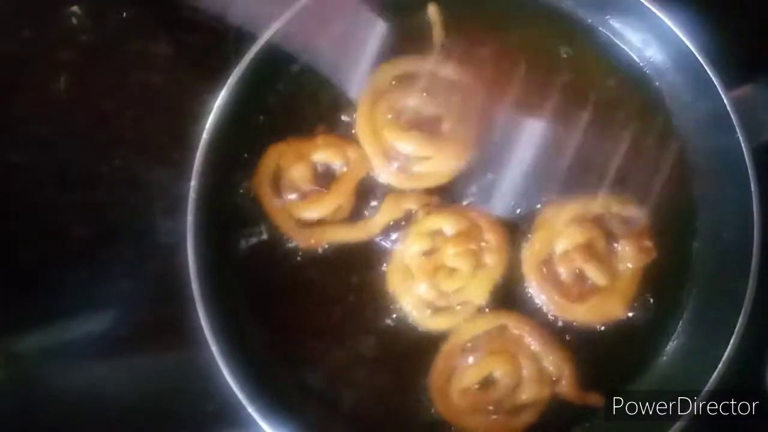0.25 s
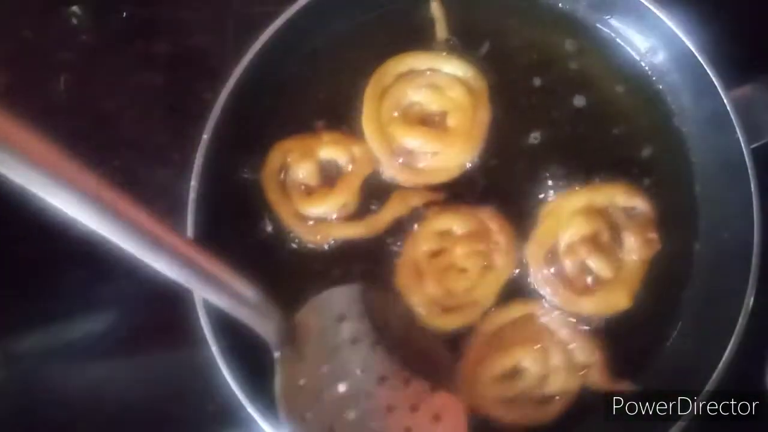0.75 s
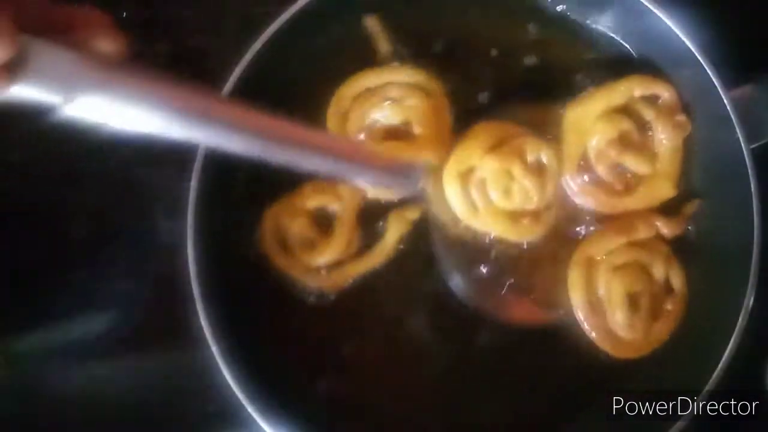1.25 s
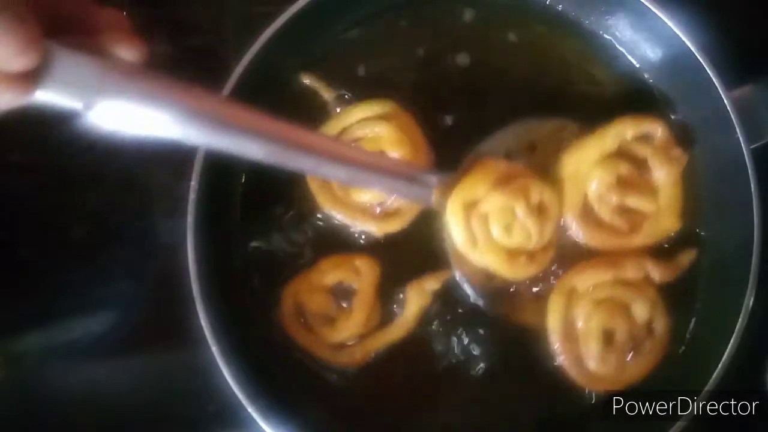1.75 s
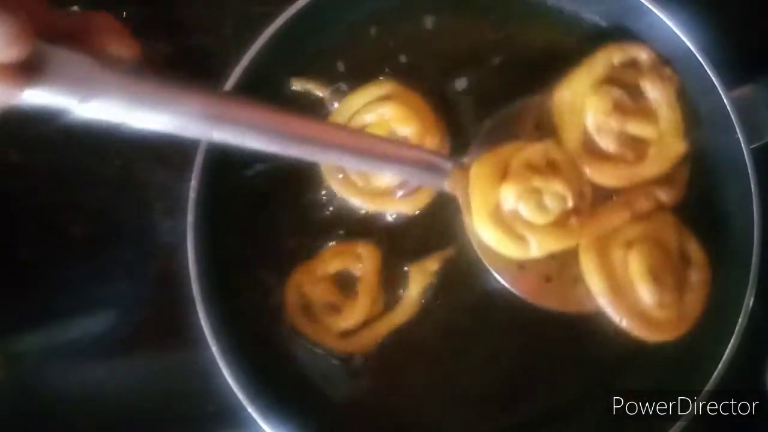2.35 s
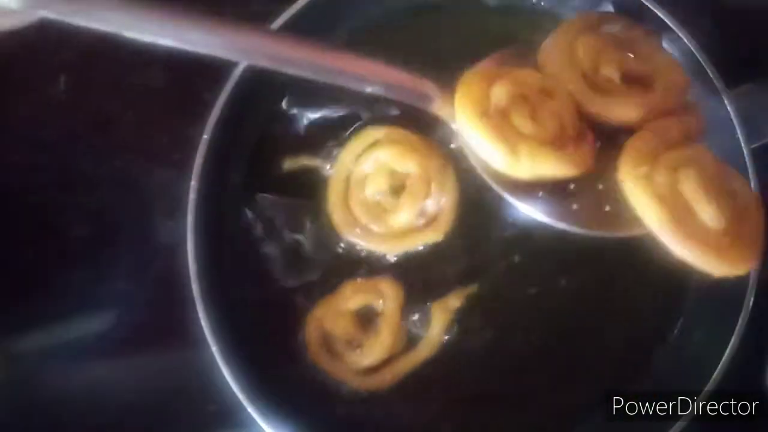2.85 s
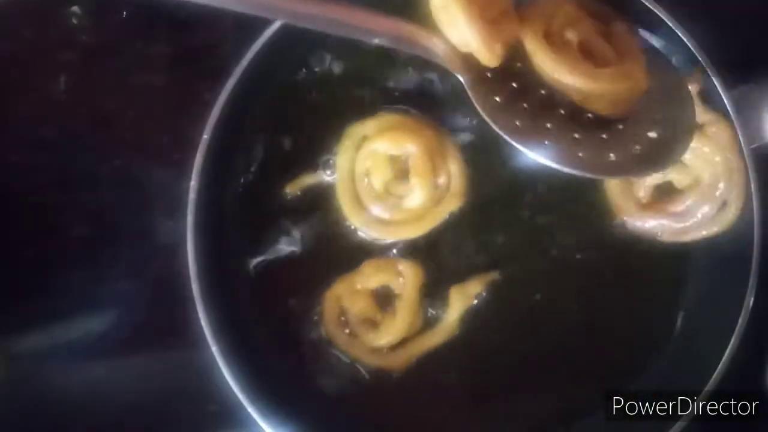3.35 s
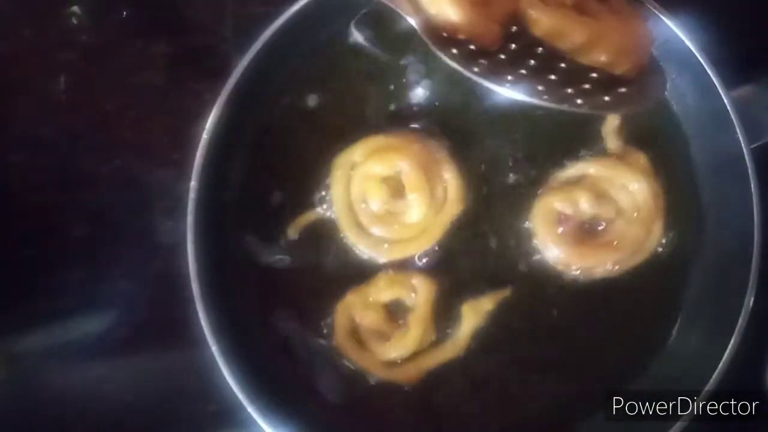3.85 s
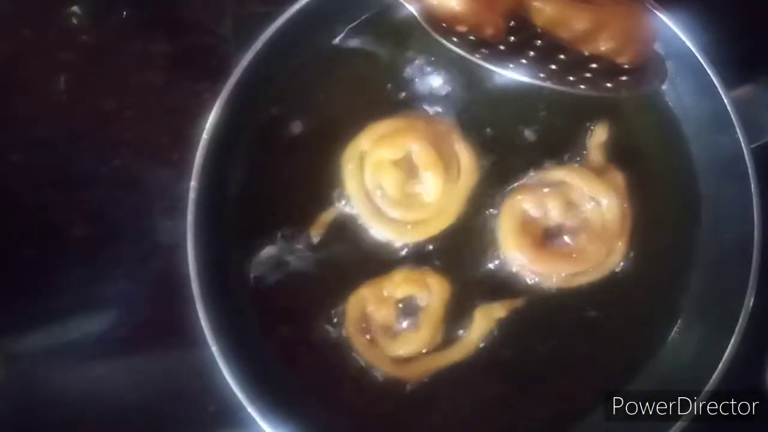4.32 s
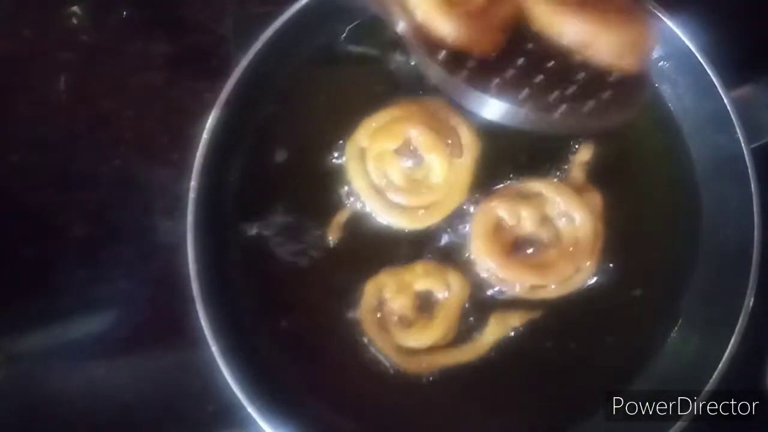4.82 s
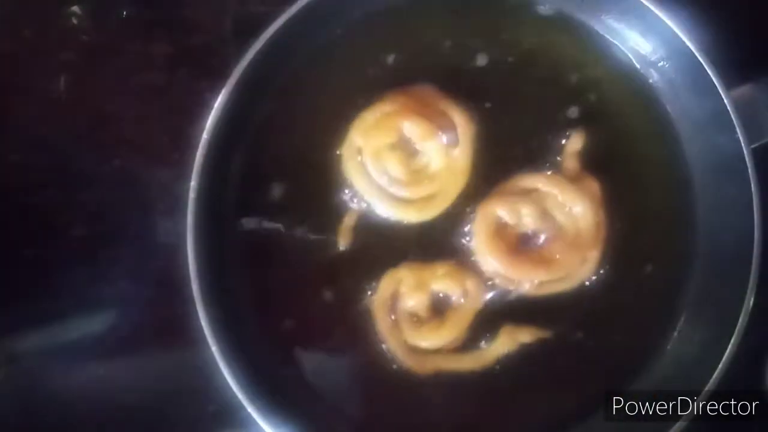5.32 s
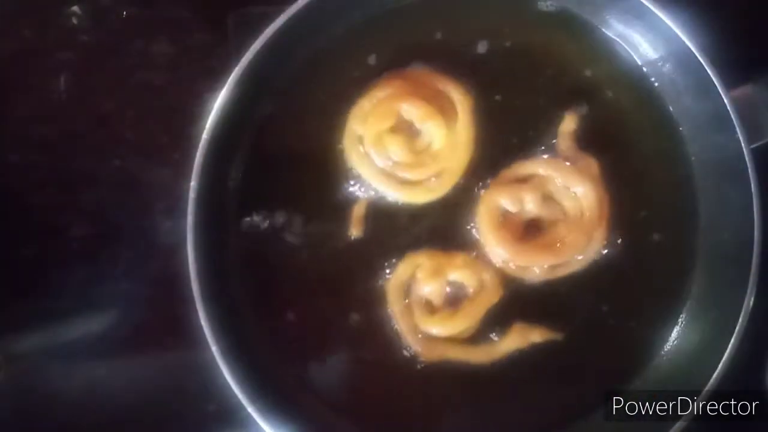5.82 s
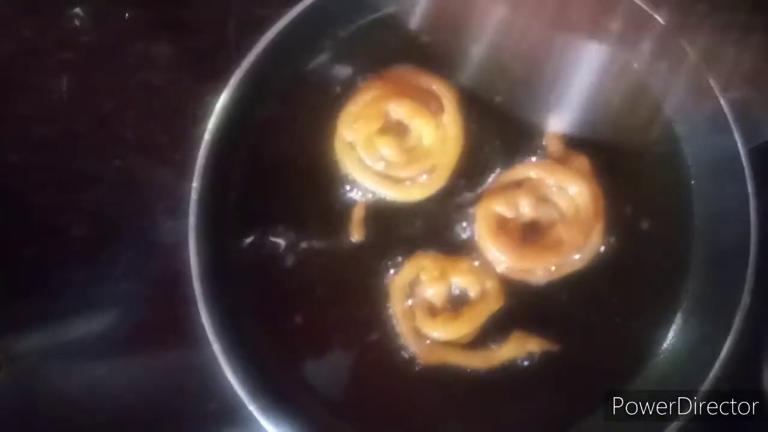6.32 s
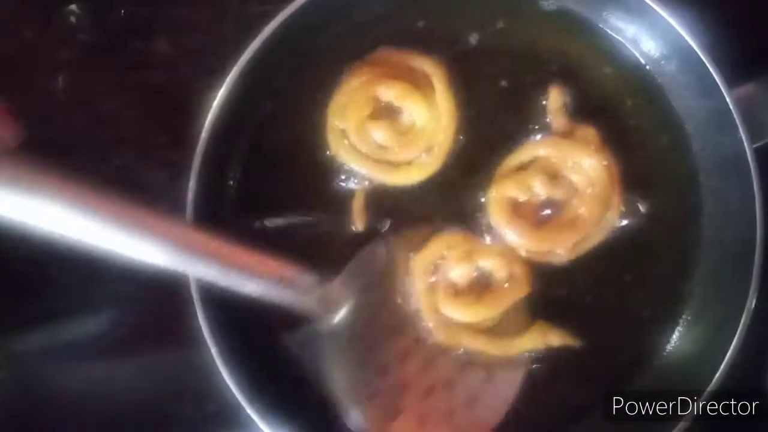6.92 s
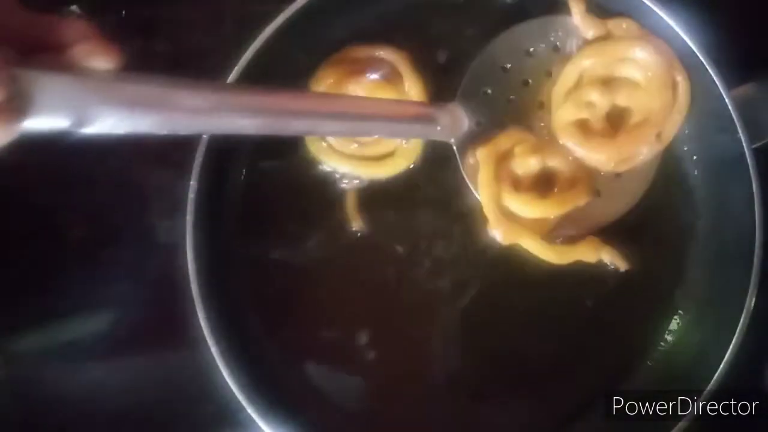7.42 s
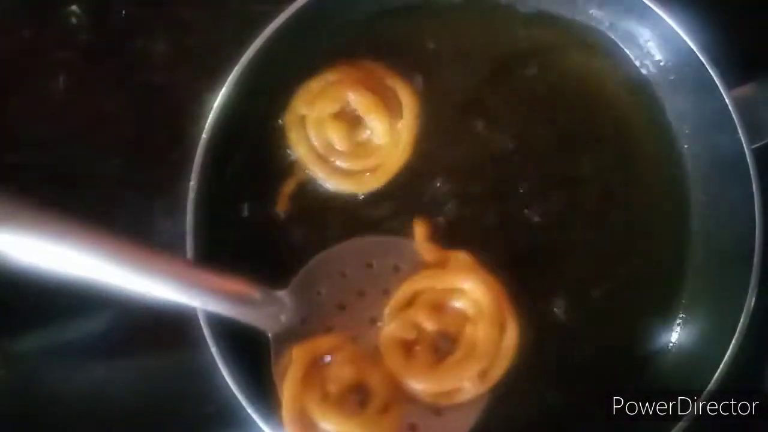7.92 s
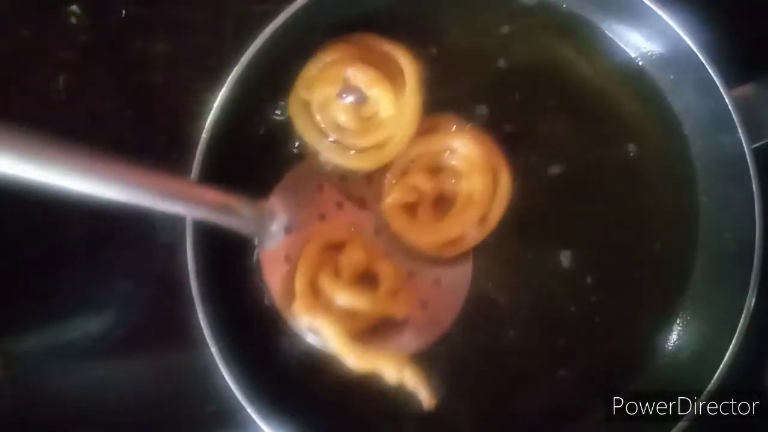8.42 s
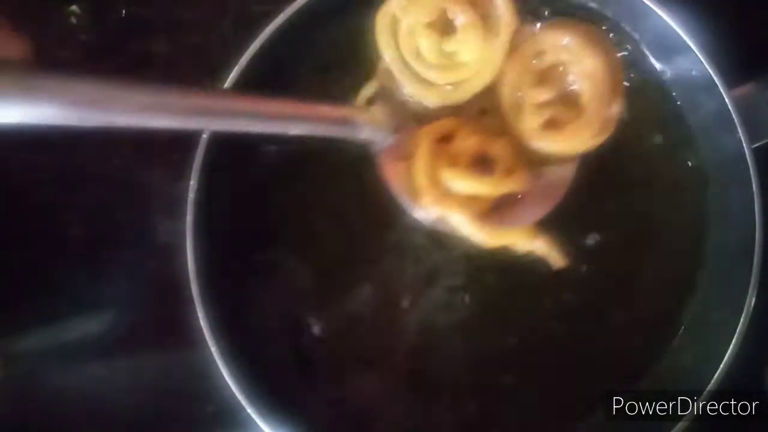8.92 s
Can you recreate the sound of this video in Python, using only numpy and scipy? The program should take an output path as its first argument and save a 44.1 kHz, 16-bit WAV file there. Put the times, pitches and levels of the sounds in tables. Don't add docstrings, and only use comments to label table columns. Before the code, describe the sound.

Sparse metallic knocks and short scrapes from a skimmer in a frying pan, each ringing briefly in a reflective kitchen. Just before six seconds comes a dense, bright steel clatter, the loudest event. Later the tool taps the pan wall and grates up it in repeated catches. Throughout, soft oil fizz, low liquid wash and a steady appliance drone, heard near on one small microphone.

```python
import sys
import numpy as np
from scipy import signal
from scipy.fft import rfft, irfft, next_fast_len
from scipy.io import wavfile

SR = 44100
rng = np.random.default_rng(int(sys.argv[2]) if len(sys.argv) > 2 else 0)


def wrap_up_sound(samples):
    columns = np.atleast_2d(samples).T
    tamed = np.clip(columns, -1, 1)
    steps = np.round(tamed * 32767).astype(np.int16)
    wavfile.write(sys.argv[1], SR, steps)


def volts_from_decibels(level):
    exponent = np.asarray(level, float) / 20
    return 10 ** exponent


N = 403956

# (frequency [Hz], level [dB], decay t60 [s])
PAN_MODES = [(287, -15, 0.63), (303.9, 2, 0.29), (360.6, -4, 0.47), (490.5, -6.5, 0.2), (619.5, -5, 0.24),
             (716, -10.5, 0.19), (784, -13, 0.29), (813, -9, 0.12), (921, 0, 0.058), (1056, -3.5, 0.15),
             (1357, -10.5, 0.16), (1820, -14, 0.23), (2117, -3.5, 0.09), (2363, -1, 0.11),
             (2510, 5.5, 0.057), (2575, -2, 0.047), (2738, -2, 0.067), (2930, -8, 0.069), (5500, -4, 0.011),
             (6350, -7, 0.03)]
# (frequency [Hz], level [dB], decay t60 [s])
HANDLE_MODES = [(843, -9, 0.15), (1054, -5, 0.067), (1167, 4, 0.044), (1230, -3.5, 0.08), (1280, -3, 0.088),
                (1410, -26, .05), (1840, -20, .04), (2340, 7.5, 0.035), (2696, 7, 0.03), (2980, 2, 0.04),
                (6250, 6, 0.03), (4000, 6, 0.025)]
# (lower edge [Hz], upper edge [Hz])
COLOUR_EDGES_HZ = [
    (230, 557),
    (500, 1136),
    (1500, 3320),
    (4400, 21000),
]
TICK_LOW_HZ = 3700


def pan_knocks():
    # (time [s], strength [dB], flatness: more boom [dB], edge: more ring and tick
    # [dB])
    knocks = [(0.71, -38, -9.5, -10.5), (1.645, -57, 4, -3), (2.211, -45, -3.5, -11), (3.136, -59, 5, 2),
              (3.169, -38, 3, -10), (3.361, -48, -7, -10.5), (3.391, -47, -26, -7.5),
              (3.616, -42.5, -5, -4), (5.062, -52, -15, 5.5), (5.075, -49.5, 0, -6), (5.09, -56, -3, -2),
              (5.103, -51, -4, 1), (5.124, -60, -4, -3), (5.149, -58, -13, -5), (5.158, -64, -15, -7),
              (6.567, -70.5, -2, 7.5), (6.777, -38, -7.5, -7), (6.802, -49, 4, -1), (6.859, -45.5, -3, -8),
              (6.889, -50, -14, -7.5), (7.494, -55, -6, -4),
              (0.866, -67.5, 14.5, -10), (1.26, -56.5, -9, -14), (1.569, -67, 13, 3.5), (1.963, -76, -6, 4),
              (2.834, -73.5, 14.5, 11), (3.258, -72, 1, 19.5), (4.741, -64.5, -4.5, 2),
              (6.966, -52, -10, -33), (7.093, -63, -2, -1), (7.323, -61, 3, -8), (7.685, -72.5, 15, -5),
              (7.777, -85, 19, 11)]
    hits = on_pan(knocks, tick_db=-19.0, tick_per_edge=0.56)
    return struck(hits, PAN_MODES, mode_db=-10.5, uneven_db=4.0,
                  crack_db=[-5.0, -4.5, -5.0, 1.0], snap=6.3)


def wall_taps():
    # (time [s], strength [dB], flatness [dB], edge [dB])
    taps = [(8.131, -53, -6, -4), (8.149, -38.5, -8, -9), (8.257, -70, -5, 16),
            (8.272, -30.5, -11.5, -12.5), (8.382, -68, 5, -11), (8.517, -50, -1, -2),
            (8.725, -57, -12, -23), (8.773, -56, 1, -16), (8.909, -48, -10, -12), (8.959, -46, -9, -8),
            (9.016, -48, -13, -7.5)]
    # (frequency [Hz], level [dB], decay t60 [s])
    wall_modes = [(299.6, -1.5, 0.45), (334, -9, 0.36), (458, 0.5, 0.14), (552, -18, 0.18),
                  (603, -20, 0.25), (720, -12, 0.065), (860, -14, .04), (980, 0, 0.038), (1070, -2, 0.043),
                  (1250, -14, 0.055), (2097, 1.8, 0.049), (2504, 2.5, 0.032), (2840, -2.5, 0.061),
                  (6240, -11, 0.03)]
    hits = on_pan(taps, tick_db=-19.0, tick_per_edge=0.77)
    return struck(hits, wall_modes, mode_db=-5.5, uneven_db=3.5,
                  crack_db=[-8.5, -5.5, -5.5, 1.0], contact_s=0.001, rattle_db=3.0)


def rim_blow():
    # (time [s], strength [dB], flatness [dB], edge [dB])
    blow = [
        (7.843, -45.5, 2, 10),
    ]
    # (frequency [Hz], level [dB], decay t60 [s])
    rim_modes = [(394, 0, 0.067), (480, -2.5, .25), (620, -3, .05), (781, -13, .05), (915, 1, .06),
                 (1440, -14, .03), (1825, -19, .02), (2143, 2, 0.019), (2390, 8, 0.018), (2700, 4.5, 0.016),
                 (2880, -17, .012), (4400, -4, 0.009), (4980, -14, .004), (6700, -4, .008)]
    hits = on_pan(blow, tick_db=-4.5, tick_per_edge=0.89)
    return struck(hits, rim_modes, mode_db=-5.0, uneven_db=2.5,
                  crack_db=[-3.5, 4.5, -19.0, -14.0], snap=1.5, rattle_db=4.0)


def handle_clanks():
    # (time [s], strength [dB], edge: more ring [dB], hardness: more tick [dB])
    clanks = [(0.076, -41, -5, -33), (0.113, -43.5, -2, -29), (5.745, -41, -8, -7), (5.75, -29.5, -4, -20),
              (5.755, -31, -3.5, -24), (5.766, -35, -14, -35), (5.774, -26, -24, -35),
              (5.781, -29, -16, -27), (5.796, -28, -3.5, -34), (5.804, -29.5, -14, -29),
              (5.812, -34, -12, -33), (5.824, -37, -6, -36), (5.832, -38, -6, -30), (5.842, -42, -2, -30),
              (5.852, -31, -9, -31), (5.86, -40, -10, -30), (5.877, -37, -9, -26), (5.886, -39.5, -7, -28),
              (5.932, -42, -4, -30), (5.959, -36.5, -8, -22), (5.967, -28.5, -6, -31),
              (5.972, -25.5, -14, -36), (5.98, -28, -12, -42), (5.991, -32, -16, -37),
              (5.995, -29, -17, -35)]
    return struck(off_pan(clanks, boom_db=-14.5), HANDLE_MODES, mode_db=-15.0, uneven_db=4.5,
                  crack_db=[-12.5, -17.5, -8.5, -3.5], contact_s=0.00094, rattle_db=1.0)


def tray_clatter():
    # (time [s], strength [dB], edge [dB], hardness [dB])
    clatter = [(6.002, -37.5, -2, -20), (6.006, -30.5, 4.5, -12), (6.02, -37.5, 7, -18),
               (6.023, -28, 3.5, -9), (6.032, -40, 10.5, -18), (6.049, -43, 6, -16), (6.06, -43, -2, -22),
               (6.068, -44, 5, -22), (6.08, -46.5, 4, -18), (6.098, -43, 6, -22), (6.114, -38.5, -3, -13),
               (6.124, -42, 3, -22), (6.15, -45, 6, -25), (6.163, -40, -2, -27), (6.18, -46, -1, -27),
               (6.195, -48.5, -4, -27)]
    # (frequency [Hz], level [dB], decay t60 [s])
    tray_modes = [(300, -3, .15), (354, 1, 0.093), (411, 8, 0.065), (613, -19, 0.25), (678, -1, 0.095),
                  (703, -1.5, 0.21), (736, 2.5, 0.091), (794, -10, 0.089), (928, -11, 0.086),
                  (1050, -3, 0.075), (1274, -8, 0.41), (1536, -15, 0.1), (2390, -4, 0.16), (2314, -8, 0.15),
                  (2440, 0, 0.1), (2600, -4.5, 0.11), (2760, -3, 0.08), (2926, -6.5, 0.045),
                  (3140, 4, 0.031), (3320, -2, 0.039), (3380, -9, 0.067), (3780, 4.5, 0.025),
                  (4080, 4, .02), (4350, 6.5, 0.027), (4750, 3.5, 0.014), (5370, 3, 0.013),
                  (6460, 1.5, 0.026), (7640, -5, .02)]
    return struck(off_pan(clatter, boom_db=-9.0), tray_modes, mode_db=-12.5, uneven_db=3.0,
                  crack_db=[-11.0, -5.5, -11.0, -12.0], contact_s=0.001, rattle_db=3.5)


def bare_ticks():
    # (time [s], strength [dB])
    ticks = [
        (3.168, -41.5),
        (3.352, -56),
        (7.777, -60),
        (8.19, -58),
    ]
    s, db = np.transpose(ticks)
    clicks = np.zeros(N)
    clicks[(s * SR).astype(int)] = volts_from_decibels(db)
    burst = dying(clicks, t60=0.023) * rng.standard_normal(N)
    return signal.sosfilt(signal.butter(3, [4300, 9200], "band", fs=SR, output="sos"), burst)


def on_pan(rows, tick_db, tick_per_edge):
    s, db, flat_db, edge_db = np.transpose(sorted(rows))
    return np.transpose([s, db, flat_db, 0 * s, edge_db, tick_db + tick_per_edge * edge_db])


def off_pan(rows, boom_db):
    s, db, edge_db, hard_db = np.transpose(rows)
    return np.transpose([s, db, boom_db + 0 * s, 0 * s, edge_db, hard_db])


def struck(hits, modes, mode_db, uneven_db, crack_db, snap=0, contact_s=None, rattle_db=5):
    first, last = int(hits[0, 0] * SR), int(hits[-1, 0] * SR)
    span = slice(max(first - 200, 0), min(last + SR // 2, N))
    luck = rng.standard_normal((len(hits), len(modes)))
    *body, tick = cracks(hits, crack_db, span, snap, contact_s or 1e-4)
    low, high = sum(body), tick
    flutter = np.tile(volts_from_decibels(rattle_db * drift(30.7)), 2)
    for k, (hz, db, t60) in enumerate(modes):
        colour = colour_of(hz)
        blows = clicks_at(hits, hits[:, 2 + colour] + db + mode_db + uneven_db * luck[:, k], span)
        if contact_s:
            blows = pressed(blows, hz, contact_s)
        own_flutter = flutter[997 * k:][:len(blows)]
        rung = ring(blows, hz, min(t60, 0.3)) * own_flutter
        if colour == 3:
            high = high + rung
        else:
            low = low + rung
    out = np.zeros(N)
    out[span] += signal.sosfilt(signal.butter(8, 3090, fs=SR, output="sos"), low)
    out[span] += signal.sosfilt(signal.butter(4, [TICK_LOW_HZ, 11000], "band", fs=SR, output="sos"), high)
    out[span] += volts_from_decibels(-11.0) * tick
    return out


def cracks(hits, crack_db, span, snap, contact_s):
    crack_t60_s = [0.074, 0.067, 0.064, 0.044]
    noise = rng.standard_normal(span.stop - span.start)
    slow = np.exp(-1 / (np.clip(contact_s, 1e-4, .01) * SR))
    out = []
    for k, t60 in enumerate(crack_t60_s):
        blows = clicks_at(hits, hits[:, 2 + k] + crack_db[k], span)
        fade = signal.lfilter([1 - slow], [1, -slow], dying(blows, t60))
        low, high = COLOUR_EDGES_HZ[k]
        out.append(band(fade * noise - snap * blows, k) * np.sqrt(SR / 2 / (high - low)))
    return out


def clicks_at(hits, db, span):
    clicks = np.zeros(span.stop - span.start)
    at = np.round(hits[:, 0] * SR).astype(int) - span.start
    np.add.at(clicks, at, volts_from_decibels(hits[:, 1] + db))
    return clicks


def pressed(x, hz, contact_s):
    r = np.exp(-1 / (np.clip(contact_s, 1e-4, .01) * SR))
    gain = (1 - r ** 2) / 2
    return signal.lfilter([gain, 0, -gain], [1, -2 * r * np.cos(2 * np.pi * hz / SR), r ** 2], x)


def strokes_of_skimmer():
    # (hardest moment [s], press-in [s], let-go [s], force [dB], flatness: more boom [dB])
    handle_rubs = [
        (0.08, 0.4, 0.11, -44, -33),
        (0.14, .012, 0.49, -63, -13),
    ]
    floor_strokes = [(.75, 0.014, 0.08, -59, 1), (.79, .02, 0.47, -49.5, -5),
                     (1.338, 0.15, 0.16, -53.5, -13.5), (1.58, 0.058, 0.5, -62, 8),
                     (1.988, 0.24, 0.066, -57, -15), (2.082, 0.056, 0.078, -68, -1),
                     (2.85, 0.04, 0.57, -59.5, 4.5), (3.168, 0.022, 0.058, -35, -5),
                     (3.36, 0.015, 0.15, -52.5, 9), (7.376, 0.091, 0.28, -62.5, 1),
                     (7.504, 0.052, 0.091, -56, 7), (7.786, 0.11, 0.034, -64, -23)]
    wall_strokes = [
        (8.43, 0.057, 0.27, -42.5, -6.5),
        (8.52, 0.022, 0.026, -37.5, -10),
        (8.56, 0.14, 0.09, -44, -1),
    ]
    lift_strokes = [
        (8.73, .05, .08, -52, -11),
        (8.85, 0.25, 0.35, -43.5, -6.5),
        (8.91, .03, .04, -45, -4),
        (8.96, .06, .07, -42.5, -4),
        (9.02, 0.04, 0.11, -47, -7),
    ]
    # (frequency [Hz], level [dB], decay t60 [s])
    dragged_modes = [(291, -6, .07), (455, -2, 0.086), (725, -11, .09), (968, -6, 0.037), (1050, 2, 0.03),
                     (1390, -6, .05), (2160, -12, .02), (2540, -5, .05), (3060, -16, .03)]
    lifted_modes = [(300, -13, .05), (453, -1, .08), (711, -3, 0.11), (915, -10, .03), (966, 0, 0.033),
                    (1070, -1, 0.037), (1830, -8, .06), (2220, -10, .02), (2540, -5, .05),
                    (2700, -3, 0.068), (2880, -7, .06)]
    out = slide(handle_rubs, HANDLE_MODES, edge_db=-9.0, rasp_db=-13.0, damping=0.3, grit_db=-35.0)
    out += slide(floor_strokes, PAN_MODES, edge_db=-11.5, rasp_db=-3.0, damping=0.38, grit_db=-35.0)
    out += slide(wall_strokes, dragged_modes, edge_db=-11.5, rasp_db=-8.0, damping=1, grit_db=-29.0)
    out += slide(lift_strokes, lifted_modes, edge_db=-13.0, rasp_db=-7.5, damping=1, grit_db=-26.0)
    return out


def slide(strokes, modes, edge_db, rasp_db, damping, grit_db):
    s, press, release, force_db, flat_db = np.transpose(strokes)[:, :, None]
    start, stop = int((s[0, 0] - .15) * SR), int((s[-1, 0] + .6) * SR)
    at = np.arange(max(start, 0), min(stop, N))
    age = at / SR - s
    away = np.maximum(-age / np.maximum(press, .004), age / np.maximum(release, .004))
    force = volts_from_decibels(force_db - 20 * away)
    catches = grains(per_s=2500, spread_db=1.5, size=len(at)) * volts_from_decibels(2.2 * drift(25)[at])
    out = np.zeros(N)
    for k, share_db in enumerate([flat_db, 0, edge_db, grit_db]):
        mix = volts_from_decibels(rasp_db) * rms_one(band(catches, k))
        if k < 3:
            rung = np.zeros(len(at))
            for hz, db, t60 in modes:
                if colour_of(hz) == k:
                    rung += volts_from_decibels(db) * ring(catches, hz, damping * t60) / np.sqrt(t60)
            mix = mix + rms_one(band(rung, k))
        total_force = np.sqrt(np.sum((force * volts_from_decibels(share_db)) ** 2, axis=0))
        out[at] += volts_from_decibels(-10.5) * total_force * rms_one(mix)
    return out


def lone_rings_and_squeak():
    # (time [s], frequency [Hz], level [dB], decay t60
    # [s])
    lone_rings = [(5.75, 950, -30, .05), (5.754, 2600, -33, .04), (5.766, 1210, -28, .03),
                  (5.7735, 1190, -24, .045), (5.781, 1227, -23, .04), (5.796, 1110, -22, .02),
                  (5.796, 2610, -29, .02), (5.8035, 1190, -25, .05), (5.811, 1250, -29, .05),
                  (5.824, 1080, -31, .04), (5.852, 1050, -27, .03), (5.856, 1250, -31, .05),
                  (5.877, 1233, -33.5, 0.087), (5.959, 800, -32, .03), (5.967, 1140, -28, .02),
                  (5.972, 1180, -22, .03), (5.979, 1235, -25, .022), (5.991, 1216, -30, .04),
                  (5.994, 1200, -23, .03), (6.005, 947, -26, .04), (6.006, 2700, -28, 0.027),
                  (6.0235, 780, -19, .035), (6.0245, 3000, -25, .02), (6.03, 2390, -25, 0.06),
                  (8.517, 1050, -36, 0.068), (8.519, 2540, -48, .05), (8.15, 289, -42, 0.23),
                  (8.274, 280, -42.5, 0.16), (8.273, 1000, -33, .05), (7.8435, 464, -26, .08),
                  (9.017, 2480, -48, 0.028), (3.169, 1070, -37, .1), (3.171, 600, -34, .09),
                  (3.39, 980, -42, .06), (3.398, 310, -40, .12), (3.617, 2500, -44, .04),
                  (1.645, 520, -52, .15), (1.647, 300, -52, .2),
                  (.73, 620, -60, 1), (3.15, 980, -51, 0.6), (3.346, 293, -36, 0.14), (3.352, 1061, -49.5, 0.23),
             (5.065, 305, -44.5, 0.27), (5.1, 6440, -68, 0.26), (5.062, 2900, -42, 0.054),
             (5.747, 7130, -52.5, 0.14), (5.757, 74, -38.5, 0.36), (0.71, 73, -60, .6), (3.6, 73, -56, .6),
             (6.2, 73, -55, 0.51), (6.78, 74, -54, 0.7), (8.15, 73, -56, .6), (6.781, 5100, -57, 0.3),
             (6.78, 6245, -54, 0.14), (6.785, 2562, -51, 0.27), (7.495, 305, -47, 0.47)]
    # (frequency [Hz], width [Hz], level [dB])
    squeak = (780, 30, -67)
    # (start [s], end [s])
    squeak_s = (4.59, 4.75)
    t, out = np.arange(N) / SR, np.zeros(N)
    waver_db = 2.5 * drift(31)
    for s, hz, db, t60 in lone_rings:
        at = int(s * SR)
        age = t[:min(SR // 2, N - at)]
        swell = 1 - np.exp(-age * hz / 2)
        height = volts_from_decibels(db - 60 * age / t60 + waver_db[at:at + SR // 2])
        out[at:at + SR // 2] += height * swell * np.sin(2 * np.pi * hz * age)
    hz, width, db = squeak
    start, end = squeak_s
    swell = np.sin(np.pi * np.clip((t - start) / (end - start), 0, 1))
    return out + volts_from_decibels(db) * swell * resonance(hz, width)


def sizzle():
    # (time [s], level [dB])
    frying = [(0.0, -72), (1.0, -72), (2.0, -74), (2.9, -73.5), (4.0, -73), (5.7, -73), (6.55, -77.5),
              (8.1, -75), (8.62, -77.5), (9.16, -78)]
    # (frequency [Hz], level [dB per Hz])
    fizz_spectrum = [(880, -50), (1500, -19), (1750, -19.5), (1940, -7.5), (2620, 2), (2920, -6),
                     (3050, -10), (3520, -21), (4000, -27), (5200, -32), (8800, -120)]
    # (frequency [Hz], level [dB per Hz])
    hiss_spectrum = [(2290, -57), (3900, -10.5), (4560, -4.5), (4940, -2.5), (6680, -4), (7500, -4),
                     (8320, -3), (9340, -11), (10700, -9), (11900, -6), (13000, -8.5), (14100, -7),
                     (15500, -13.5)]
    fry_db = level_in_time(frying)
    stirred_db = stirring() + 72
    fizz_db = fry_db + 4 + 0.75 * stirred_db
    hiss_db = fry_db + 0.23 * stirred_db
    bursts_db = 0.61 * drift(10.3)
    fizz = coloured(grains(per_s=5000, spread_db=2.5), fizz_spectrum)
    hiss = coloured(grains(per_s=14000, spread_db=3.0), hiss_spectrum)
    return fizz * volts_from_decibels(fizz_db + bursts_db + 1.0 * drift(25)) + hiss * volts_from_decibels(hiss_db + 2.1 * bursts_db)


def stirring():
    # (time [s], level [dB])
    stirred = [(0.0, -65), (0.19, -70.5), (0.75, -71), (0.87, -71), (1.05, -69), (1.76, -72.5),
               (2.24, -66.5), (2.6, -72.5), (3.2, -72.5), (3.32, -69.5), (3.98, -75), (5.7, -77.5),
               (6.55, -74.5), (7.02, -76), (7.4, -72.5), (8.19, -74), (8.32, -67), (9.05, -61.5)]
    since_last_s = np.maximum(np.arange(N) / SR - stirred[-1][0], 0)
    return level_in_time(stirred) - 144 * since_last_s


def oil_stir():
    # (frequency [Hz], level [dB per Hz])
    stir_spectrum = [(150, -46), (250, -5.5), (446, -7), (539, -10.5), (828, -6.5), (1030, -4),
                     (1280, -9.5), (1800, -12.5), (2340, -53), (3960, -120)]
    return volts_from_decibels(stirring() + 1.0 * drift(6.2)) * coloured(rng.standard_normal(N), stir_spectrum)


def bass_air():
    # (frequency [Hz], level [dB per Hz])
    air_spectrum = [(15, -49), (30, -21.5), (55, -12), (95, -2), (135, -8.5), (184, -6), (250, -19),
                    (330, -41)]
    return volts_from_decibels(-72.5) * coloured(rng.standard_normal(N), air_spectrum)


def appliance_drone():
    # (frequency [Hz], width [Hz], level [dB])
    drone_resonances = [(71.8, 6.8, -75.5), (118.6, 9.9, -72)]
    drone = sum(volts_from_decibels(db) * resonance(hz, width) for hz, width, db in drone_resonances)
    return drone + volts_from_decibels(-65.5) * np.sin(2 * np.pi * 119.5 * np.arange(N) / SR)


def kitchen(x):
    # (frequency [Hz], decay t60 [s])
    room_decay = [(150, 0.58), (500, 0.51), (2000, 0.52), (6000, 0.72), (12000, 0.3)]
    t = np.arange(SR) / SR
    hz, t60 = np.transpose(room_decay)
    edges, tail = 50 * 2 ** np.arange(0, 8.6, .5), 0
    for low, high in zip(edges, edges[1:]):
        half_octave = signal.butter(2, [low, high], "band", fs=SR, output="sos")
        noise = signal.sosfilt(half_octave, rng.standard_normal(SR))
        band_t60 = np.interp(np.log(low), np.log(hz), t60)
        treble_db = -3.5 * (low > TICK_LOW_HZ)
        tail = tail + noise * volts_from_decibels(-60 * t / band_t60 + treble_db)
    tail = tail * np.clip((t - .003) / 0.0091, 0, 1)
    return signal.fftconvolve(x, tail / np.sqrt(np.sum(tail ** 2)))[:N]


def rms_one(x):
    return x / np.sqrt(np.mean(x ** 2) + 1e-20)


def level_in_time(points):
    s, db = np.transpose(points)
    return np.interp(np.arange(N) / SR, s, db)


def coloured(x, spectrum):
    size = next_fast_len(N)
    hz, db = np.transpose(spectrum)
    bins_hz = np.arange(size // 2 + 1) * SR / size
    shape_db = np.interp(np.log(bins_hz + 1), np.log(hz), db)
    return rms_one(irfft(rfft(x, size) * volts_from_decibels(shape_db), size)[:N])


def drift(rate):
    r = np.exp(-80 * np.pi * rate / SR)
    slow = signal.lfilter([1], [1, -2 * r, r * r], rng.standard_normal(N // 40 + 2002))[2000:]
    return np.interp(np.arange(N) / 40, np.arange(len(slow)), rms_one(slow))


def dying(clicks, t60):
    return signal.lfilter([1], [1, -volts_from_decibels(-60 / (t60 * SR))], clicks + 1e-18)


def ring(clicks, hz, t60):
    r, w = volts_from_decibels(-60 / (t60 * SR)), 2 * np.pi * hz / SR
    return signal.lfilter([0, np.sin(w)], [1, -2 * r * np.cos(w), r * r], clicks + 1e-18)


def resonance(hz, width):
    return rms_one(ring(rng.standard_normal(N), hz, 2.2 / width))


def band(x, k):
    return signal.sosfilt(signal.butter(3, COLOUR_EDGES_HZ[k], "band", fs=SR, output="sos"), x)


def colour_of(hz):
    return np.searchsorted([500, 1500, 3500], hz)


def grains(per_s, spread_db, size=N):
    draw, out = rng.random((size, 3)), np.zeros(size)
    clicked = draw[:, 0] < per_s / SR
    born = draw[clicked]
    size_db = spread_db * np.minimum(-np.log(born[:, 1] + 1e-9), 5)
    out[clicked] = volts_from_decibels(size_db) * np.sign(born[:, 2] - .5)
    return rms_one(out)


def scene():
    metal = pan_knocks() + wall_taps() + handle_clanks() + tray_clatter() + strokes_of_skimmer()
    near = rim_blow() + bare_ticks()
    mic_low_cut = signal.butter(4, 227, "high", fs=SR, output="sos")
    metal, near = signal.sosfilt(mic_low_cut, [metal, near])
    room = volts_from_decibels(-4.5) * kitchen(metal + volts_from_decibels(-2) * near)
    steady = sizzle() + oil_stir() + bass_air() + appliance_drone()
    mono = metal + near + room + lone_rings_and_squeak() + steady
    return np.array([mono, mono])


def top_cut(x):
    return signal.sosfilt(signal.butter(12, 15680, fs=SR, output="sos"), x)


def record(dry):
    # (frequency [Hz], level [dB per Hz])
    side_spectrum = [(20, -10), (200, -4), (1000, -3.5), (2500, -12), (4000, -0.5), (9000, 3.5),
                     (15400, 2.5), (15500, -60)]
    side = volts_from_decibels(-83) * coloured(rng.standard_normal(N), side_spectrum)
    cut = signal.sosfilt(signal.ellip(12, .5, 60, 15500, fs=SR, output="sos"), dry)
    return top_cut(cut + side * [[1], [-1]])


dry = scene()
out = record(dry)
wrap_up_sound(out)
```